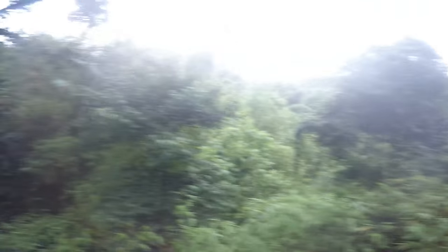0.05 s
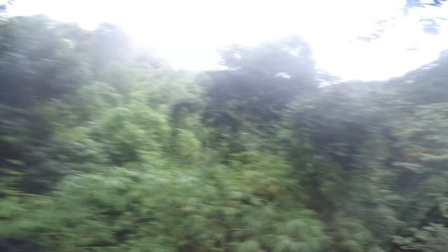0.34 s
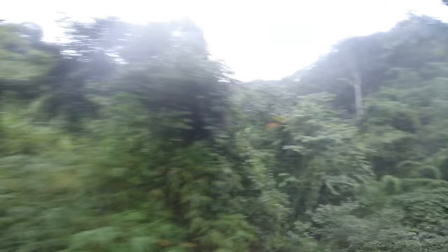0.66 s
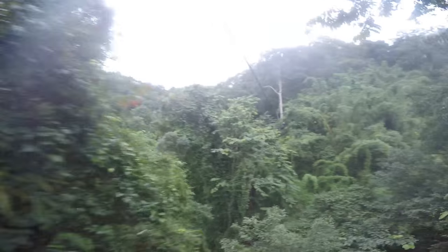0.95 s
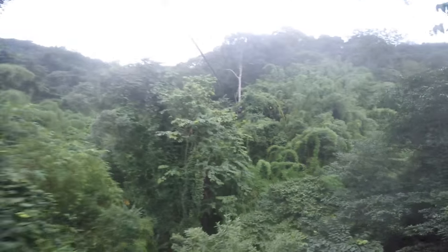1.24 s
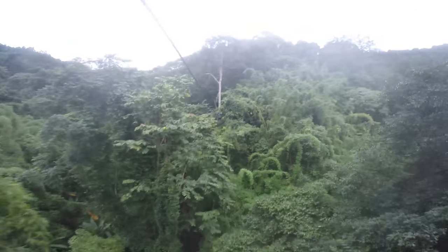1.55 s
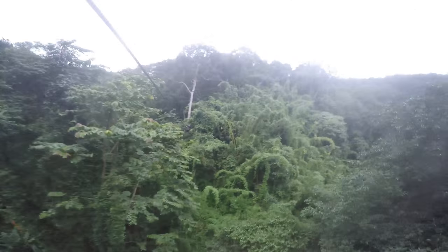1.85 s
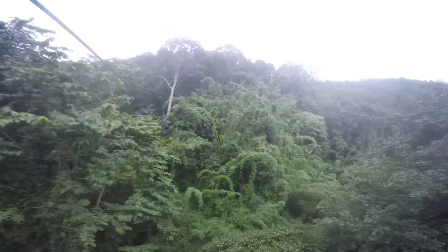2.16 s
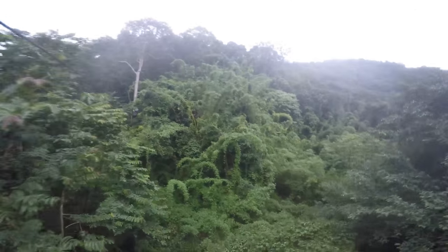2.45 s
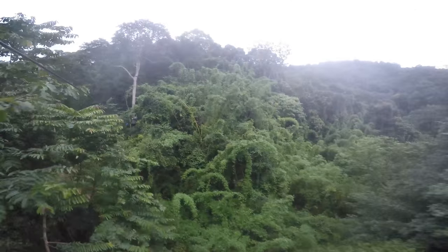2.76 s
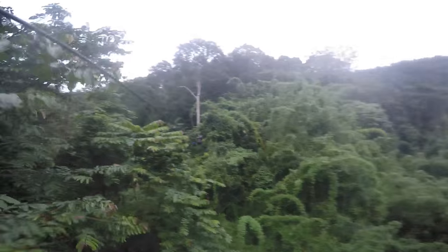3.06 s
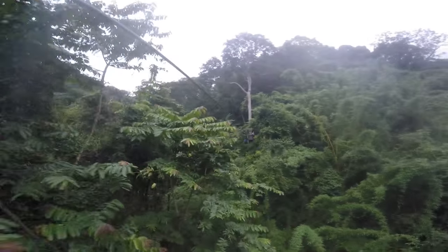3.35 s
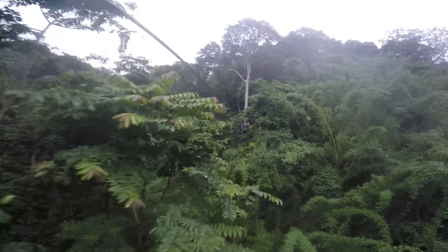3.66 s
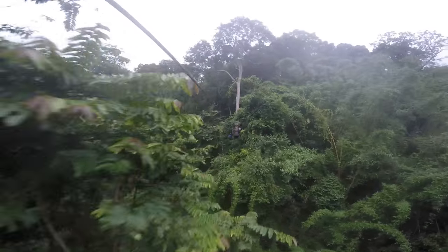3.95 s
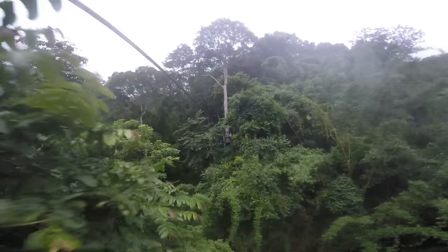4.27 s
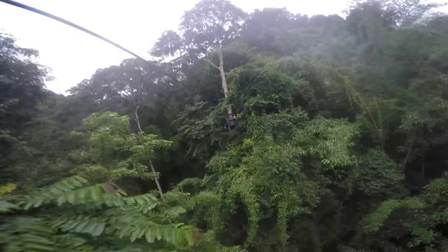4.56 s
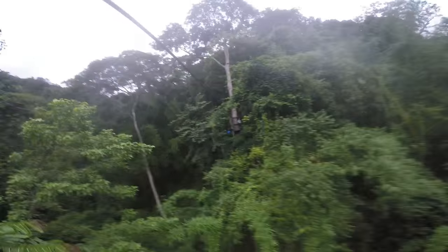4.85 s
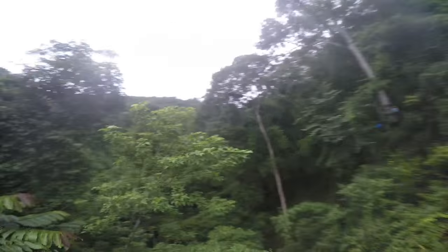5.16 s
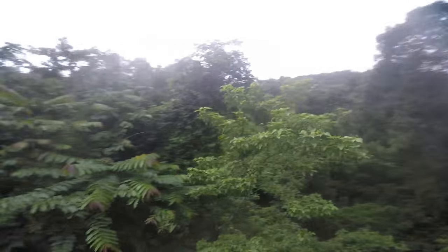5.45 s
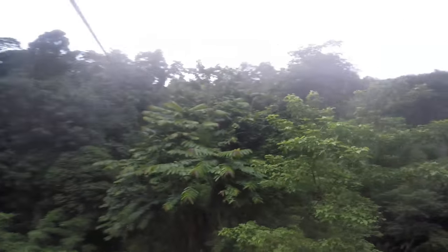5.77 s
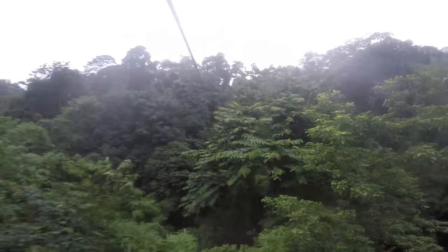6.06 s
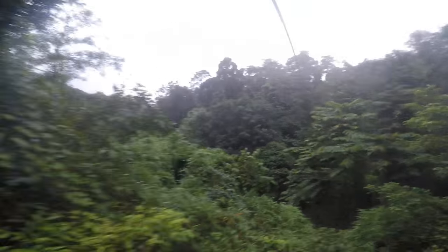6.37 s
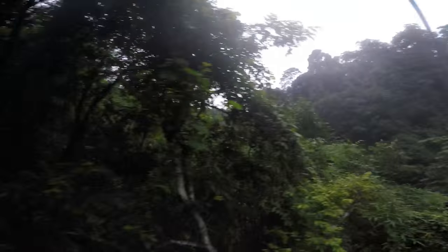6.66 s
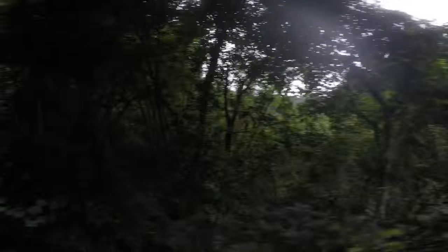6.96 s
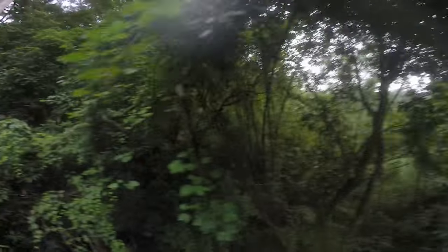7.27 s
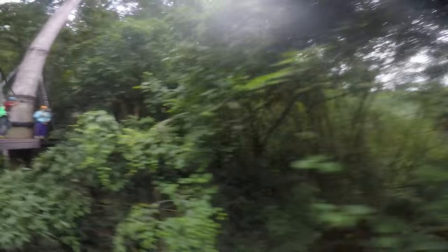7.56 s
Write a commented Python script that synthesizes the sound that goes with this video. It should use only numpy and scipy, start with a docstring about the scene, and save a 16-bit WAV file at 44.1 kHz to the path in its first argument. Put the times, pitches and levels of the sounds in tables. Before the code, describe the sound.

Outdoors, pulleys roll along a zip-line cable just overhead with a continuous sizzling whirr and a whine that rises with speed. The rider's microphone picks up low wind rumble and a few light, hollow bumps near the start. A wheel sings in short, fluttering tones through the middle. Later the whine sinks as the ride slows, while the wheel rim scrapes and rings against the cable and the wind buffets more strongly.

```python
"""A zip-line trolley hums along a stranded steel cable, gathering speed, then slowing.
Its pulleys ride the twisted strands, so the pitch follows the speed; a slipping wheel sings.
Friction in the groove rings the side plates, wheels and rims, with sizzle and hiss on top.
Wind buffets the rider's microphone, and a few early knocks land on its housing."""
import sys
import numpy as np
from scipy import signal
from scipy.fft import rfft, irfft, next_fast_len
from scipy.io import wavfile
from scipy.ndimage import uniform_filter1d, map_coordinates

SR = 44100
rng = np.random.default_rng(int(sys.argv[2]) if len(sys.argv) > 2 else 0)


def dump_mix(stems):
    """Bounce the given channels to the path in sys.argv[1] as a 16-bit WAV at rate SR."""
    frames = np.atleast_2d(stems).T  # one column per channel
    limited = np.clip(frames, -1, 1)  # hard clip at full scale
    pcm = np.round(limited * 32767).astype(np.int16)
    wavfile.write(sys.argv[1], SR, pcm)


N = 335766
TIME = np.arange(N) / SR


def strand_hum(speed, strands, load_db):
    """The pulleys ride the twisted strands and hum at multiples of the strand rate."""
    # The main partials. Each row: multiple of the strand rate, gain in dB, share of the load swing,
    # phase blur in radians per multiple, flutter in dB, gain in dB once the wheel leans.
    main_partials = [(2, 0, 1, 0.11, 1.5, 5), (3, -5.5, .1, 0.53, -1, -11), (4, 0.5, 0.8, 0.13, 2, 4),
                     (6, -4.5, 0.32, 0.13, 1, 2.5)]
    # The upper partials. Each row: multiple of the strand rate, relative level in dB.
    overtones = [(5, 1), (8, 5.5), (10, 12.5), (12, 5.5)]
    # How strongly the trolley radiates each pitch. Each row: frequency in Hz, level in dB.
    response = [(430, -49), (500, -65.5), (545, -58.5), (595, -57), (620, -59), (640, -52), (652, -50),
                (720, -66), (860, -58), (980, -52.5), (1090, -50), (1180, -50.5), (1225, -50.5),
                (1270, -52), (1303, -45), (1480, -47.5), (1660, -52), (1790, -41), (1970, -43)]
    # A partial ducks briefly. Each row: centre and half length in seconds, multiple, depth in dB.
    fades = [(0.2, 0.27, 4, -18), (0.85, 0.35, 2, -7), (1.147, 0.8, 6, -13), (5.45, 0.25, 2, -10),
             (5.665, 0.15, 4, -6), (6.044, 0.11, 4, -13), (7.22, 0.05, 2, -23), (7.57, 0.069, 2, -22)]
    # The groan in the groove. Each row: cycles per strand, relative level in dB.
    groan_texture = [(2.2, -19), (2.55, -12), (2.8, -34), (3, 4), (3.2, -14.5), (3.4, 1.5), (3.8, -14.5)]
    groan_db, upper_db = -49, -52
    strands_per_turn, wobble_strands = 16, 0.016
    lean_start_s, lean_ramp_s = 4.9, 0.69
    pace = speed / speed.max()
    unrest = pace ** -4  # a slow wheel follows every bump
    # A wheel slightly out of round wobbles the pitch once a turn.
    rolled = strands + wobble_strands * unrest * np.sin(2 * np.pi * strands / strands_per_turn)
    # Late in the run the wheel leans on its rim: less groan, sharper upper partials.
    lean = np.clip((TIME - lean_start_s) / lean_ramp_s, 0, 1)
    hum = from_db(groan_db - 9 * lean) * pace ** 5.3 * cable_rasp(groan_texture, speed, strands)
    for multiple, db, load_share, blur, flutter_db, lean_db in main_partials:
        response_db = np.interp(multiple * speed, *np.transpose(sorted(response)))
        fade_db = sum(depth_db * bell(s, half_s) for s, half_s, k, depth_db in fades if k == multiple)
        gain = from_db(db + response_db + load_share * load_db + lean_db * lean + fade_db)
        hum += gain * partial(rolled, unrest, multiple, blur, flutter_db)
    # The higher the partial, the more speed it needs.
    upper = sum(from_db(db) * pace ** k * partial(rolled, unrest, k, blur=0.085, flutter_db=3)
                for k, db in overtones)
    return hum + wheel_song(rolled) + from_db(upper_db + 0.74 * load_db + 3 * lean) * upper


def partial(strands, unrest, multiple, blur, flutter_db):
    """One partial of the hum; uneven strands blur its phase and shake its level."""
    jitter = blur * multiple * (drift(4.9) + 0.27 * unrest * drift(46))
    phase = 2 * np.pi * multiple * strands + jitter
    return rms_one(np.sin(phase) * from_db(flutter_db * drift(36)))


def wheel_song(strands):
    """The wheel slips in the groove and sings a tone that flutters and breaks up."""
    # Each row: centre and half length in seconds, multiple of the strand rate, level in dB,
    # ratio of clean tone to hoarseness.
    slips = [(0.1, 0.28, 6, -42.5, 1), (2.21, 0.07, 6, -39, 1.6), (2.4, 0.12, 6, -37.5, 1.8),
             (2.67, 0.14, 6, -42, 1.8), (3.0, 0.24, 6, -38.5, 2.2), (3.529, 0.17, 6, -37.5, 2.4),
             (3.68, 0.25, 10, -35.5, 1.3), (4.082, 0.08, 10, -37, 1.2), (4.57, 0.1, 6, -39, 1.8),
             (4.85, 0.18, 6, -36.5, 2.2), (5.111, 0.081, 6, -39, 1.8), (5.53, 0.12, 6, -34, 1.9),
             (5.471, 0.22, 7, -41, .8), (5.539, 0.11, 8, -38.5, 1), (5.6, 0.2, 5, -43, 0.67),
             (5.949, 0.36, 10, -34.5, 1.2), (6.8, 0.4, 8, -45, 1)]
    return sum(from_db(db) * hoarse_tone(s, half_s, multiple * strands, width_hz=30, clean=clean)
               for s, half_s, multiple, db, clean in slips)


def cable_rasp(texture, speed, strands):
    """The uneven cable passes at the speed of travel, so its rasp glides with the hum."""
    mean_speed = speed.mean()
    surface = noise([(cycles * mean_speed, db) for cycles, db in texture])
    return map_coordinates(surface, [strands / mean_speed * SR], order=1, mode="nearest")


def trolley_whirr(speed, strands, load_db, sizzle_db, hiss_db):
    """Friction rings the plates, wheels and rims, sizzles and hisses; rubs and scrapes swell it."""
    # The trolley's resonances. Each row: frequency in Hz, width in Hz, relative level in dB.
    plate_modes = [(1600, 245, -8.5), (2415, 157, 1), (2730, 77, -4)]
    wheel_modes = [(3018, 330, -7.5), (3277, 226, 1.5), (3422, 152, 3), (4170, 31, -11.5)]
    rim_modes = [(3605, 260, 4.5), (3665, 113, 8.5), (3807, 91, -4)]
    sizzle_modes = [(4170, 390, -6.5), (4744, 174, 2), (5090, 300, -4), (5500, 340, 1.5), (5860, 220, 4),
                    (6160, 135, 3), (6491, 190, 9), (6602, 364, 8), (6957, 260, 4)]
    # The contact hiss. Each row: frequency in Hz, relative level in dB.
    hiss_spectrum = [(4200, -43), (7000, 10), (7400, 11), (7700, 6.5), (8020, 11.5), (8500, 5), (9050, 6.5),
                     (9500, 3.5), (9850, 7), (10150, 0.5), (10600, 10), (11100, 5.5), (11700, -3),
                     (12700, 5.5), (13600, -0.5), (15300, -4)]
    # The cable's unevenness. Each row: cycles per strand, relative level in dB.
    cable_texture = [(2.3, -12), (3.9, -14.5), (4.6, -3), (4.8, -17), (5.05, -12), (5.25, 1.5), (5.9, 1),
                     (6.4, 1), (7, 3), (7.5, -36), (8, 5.5), (8.6, 1), (10, -7.5), (11, -7.5)]
    # The roughness of the passing cable. Each row: time in seconds, rasp level in dB.
    roughness = [(0, -45.5), (.5, -47.5), (1.05, -41.5), (1.3, -52), (1.75, -39.5), (2.4, -35), (2.8, -36),
                 (3.6, -36), (4.35, -41), (4.65, -37), (5.1, -44.5), (5.7, -41), (6.4, -43), (6.6, -39.5),
                 (7.61, -39.5)]
    # The rider sways and presses the rim against the cable.
    # Each row: centre and half length in seconds, rim level in dB, plate level in dB.
    rubs = [(5.542, 0.095, -25, -40), (5.8, 0.18, -26, -30), (6.16, 0.17, -29, -33),
            (6.45, 0.12, -23.5, -34), (6.76, 0.18, -20.5, -33.5), (7.124, 0.1, -23.5, -75),
            (7.23, 0.087, -39, -32.5), (7.42, 0.18, -25, -36)]
    # Brief hard scrapes of the rim. Each row: centre in seconds, boost in dB.
    scrapes = [(5.491, 5), (5.517, 1.5), (5.578, 4), (5.879, 5), (6.644, 4.5), (6.853, 2.5)]
    plate_db, wheel_db, rim_db = -40.5, -31, -36.5
    rim_rub = swells([(s, half_s, db) for s, half_s, db, _ in rubs])
    plate_rub = swells([(s, half_s, db) for s, half_s, _, db in rubs])
    plate_gain = np.hypot(from_db(plate_db + 0.39 * load_db), plate_rub)
    rim_gain = np.hypot(from_db(rim_db + load_db), rim_rub)
    rolling = friction(speed, grains_per_strand=7, size_db=2.5, smooth_db=-2, flutter_db=0.3)
    rubbing = friction(speed, grains_per_strand=5.6, size_db=3.5, smooth_db=1, flutter_db=1.26)
    fine = friction(speed, grains_per_strand=16, size_db=4, smooth_db=1, flutter_db=0.75)
    gritty = friction(speed, grains_per_strand=12, size_db=3, smooth_db=-5, flutter_db=1.17)
    rasp_db, = curves(roughness)
    body = from_db(rasp_db) * cable_rasp(cable_texture, speed, strands) + whines()
    body += plate_gain * resonate(rolling, plate_modes, low_hz=1150, high_hz=3040)
    body += from_db(wheel_db + load_db) * resonate(rolling, wheel_modes, low_hz=2460, high_hz=4350)
    body += rim_gain * resonate(rubbing, rim_modes, low_hz=3303, high_hz=4050)
    treble = from_db(sizzle_db + 0.5) * resonate(fine, sizzle_modes, low_hz=3940, high_hz=6850)
    treble += from_db(hiss_db - 0.5) * colour(gritty, hiss_spectrum)
    whirr = rider_echoes(shift_colour(frame_notches(body + treble)))
    scrape_db = sum(db * bell(s, half_s=0.0091) for s, db in scrapes)
    return whirr * from_db(scrape_db + 0.62 * drift(20))


def friction(speed, grains_per_strand, size_db, smooth_db, flutter_db):
    """Tiny uneven impacts of wires on the groove, over smooth sliding noise."""
    hits = rng.random(N) < grains_per_strand * speed / SR
    sizes = from_db(size_db * np.minimum(rng.exponential(1, N), 3)) * rng.choice([-1, 1], N)
    grains = rms_one(hits * sizes) + from_db(smooth_db) * rng.standard_normal(N)
    return grains * from_db(flutter_db * drift(39))


def whines():
    """Hoarse whines glide through the whirr or ring on the rim."""
    # Each row: centre and half length in seconds, pitch at the centre in Hz, glide in Hz per second,
    # width in Hz, level in dB.
    glides = [(0.303, 0.42, 1600, 404, 70, -46), (0.522, 0.19, 1472, 523, 51, -41.5),
              (0.722, 0.15, 1720, 550, 40, -47), (0.2, 0.32, 2418, 56, 44, -42.5),
              (0.757, 0.25, 2506, 400, 38, -38.5), (0.921, 0.1, 1960, 1500, 100, -42),
              (1.301, 0.4, 2087, -59, 62, -46.5), (0.795, 0.35, 3680, 3, 9.5, -37.5),
              (1.934, 0.21, 2496, 192, 70, -38), (2.098, 0.53, 3705, -1.5, 12, -40),
              (5.825, 0.12, 2443, -500, 36, -32), (6.0, 0.49, 3690, -1.5, 16, -32.5),
              (6.857, 0.38, 3694, -3.5, 10.6, -30.5)]
    out = np.zeros(N)
    for s, half_s, hz, hz_per_s, width_hz, db in glides:
        cycles = hz * TIME + hz_per_s * (TIME - s) ** 2 / 2
        out += from_db(db) * hoarse_tone(s, half_s, cycles, width_hz, clean=0)
    return out


def frame_notches(x):
    """The frame hardly moves at its antiresonances, which notch the whirr."""
    # Each row: frequency in Hz, width in Hz, depth in dB.
    antiresonances = [(2285, 64, -2), (4025, 78, -7.5), (4350, 110, -5), (5220, 130, -5.5),
                      (6300, 136, -15)]
    for hz, width_hz, db in antiresonances:
        x = band_eq(x, hz, width_hz, db)
    return x


def shift_colour(x):
    """Peaks and hollows come and go in the whirr."""
    # The sizzle's low edge thins and fills in. Each row: time in seconds, gain in dB.
    low_sizzle = [(0, -19), (.55, -7), (1.3, -10), (2.3, 6.5), (3.3, 3), (4.05, -5), (4.5, 4.5), (5.1, 2),
                  (5.5, -7), (7.05, -1.5), (7.27, -8), (7.45, 0)]
    # Each row: centre and half length in seconds, frequency and width in Hz, boost or cut in dB.
    shifts = [(0.1, 0.54, 7140, 500, 10.5), (0.0, 0.16, 5270, 700, -16), (-0.2, 0.55, 6440, 400, -7),
              (1.15, 0.54, 6780, 353, -19), (1.35, 0.28, 1410, 180, 8), (1.7, 0.86, 1560, 220, -4),
              (0.6, 0.5, 2050, 150, -6), (0, 0.45, 1800, 70, -4), (5, 0.44, 2030, 99, -7),
              (0.46, 0.028, 13800, 2500, 7), (0.65, 0.25, 13000, 900, 7), (0.2, 0.4, 8600, 600, 2.5),
              (3.5, 0.27, 15000, 900, 2), (4, 0.35, 10600, 1100, 4), (4.0, 0.41, 1500, 370, 2.5),
              (4.15, 0.44, 2500, 260, -4), (5, 0.4, 2480, 160, -4), (5, 0.42, 6520, 250, -5),
              (5, 0.46, 10330, 300, -6), (0.5, 0.7, 8200, 450, -5), (1, 0.8, 4300, 200, -4),
              (4.45, 0.26, 5450, 400, 7.5), (5.25, 0.22, 2400, 300, 1), (6.75, 0.46, 1330, 200, -9),
              (7.55, 0.17, 2700, 350, -1), (2.73, 0.2, 2680, 380, -6), (4.5, 1.73, 3650, 260, -6),
              (4.74, 0.27, 2760, 460, -16.5), (4.75, 0.39, 4700, 560, -13), (4.796, 0.42, 5450, 400, 6),
              (4, 0.74, 7400, 300, -5), (4.5, 1.3, 8070, 400, 4), (5, 0.57, 3390, 210, 5),
              (4.938, 0.18, 11100, 600, 11), (5.397, 0.25, 13600, 600, 4), (5.527, 0.15, 3380, 200, 8),
              (6, 0.11, 5500, 250, 6), (5.95, 0.25, 11000, 760, 9.5), (6.397, 0.7, 8050, 500, -8),
              (6.65, 0.4, 12700, 1490, 7.5), (7.27, 0.073, 5500, 1500, -18), (7.35, 0.3, 1600, 450, -10)]
    low_db, = curves(low_sizzle)
    out = band_eq(x, hz=4680, width_hz=440, db=low_db)
    for s, half_s, hz, width_hz, db in shifts:
        near = around(s, half_s)
        out[near] = band_eq(out[near], hz, width_hz, db * bell(s, half_s)[near])
    return out


def rider_echoes(x):
    """Short echoes off the rider and gear comb the whirr, sweeping as the rider swivels."""
    # The swivel. Each row: time in seconds, turn from 0 (along the cable) to 1 (side-on).
    swivel = [(0, 0.87), (0.45, 0.68), (1.1, 0.49), (1.9, 0.5), (2.4, 0.14), (3, 0.15), (3.55, 0.1),
              (4.05, 0.45), (4.6, 0.015), (5.2, 0.014), (5.65, 0.59), (6.05, 0.77), (6.5, 0.79),
              (6.87, 0.89), (7.08, 0.37), (7.28, 0.87), (7.43, 0.69), (7.61, 0.99)]
    # Each row: extra path in metres along the cable and side-on, then gain along and side-on.
    echoes = [(0.037, 0.097, 0.066, 0.26), (0.17, 0.169, 0.14, -0.11), (0.271, 0.262, 0.2, 0.085),
              (0.331, 0.35, 0.209, -0.063), (0.511, 0.507, -0.21, -0.076)]
    sound_m_per_s = 343
    turn, = curves(swivel)
    out = x.copy()
    for path_along, path_side, gain_along, gain_side in echoes:
        path = path_along + (path_side - path_along) * turn
        gain = gain_along + (gain_side - gain_along) * turn
        out += gain * np.interp(TIME - path / sound_m_per_s, TIME, x)
    return out


def wind(speed):
    """Eddies rumble on the microphone, gusts buffet it and sound its housing, and air rushes past."""
    # The wind's spectra. Each row: frequency in Hz, relative level in dB.
    rumble_spectrum = [(10, 2), (18, -6.5), (27, 5), (36, -6), (50, -14), (75, -27), (150, -39.5)]
    buffet_spectrum = [(35, -13), (65, 2.5), (100, -3), (135, -8.5), (175, -21.5), (250, -28.5),
                       (600, -33.5), (1500, -35)]
    rush_spectrum = [(150, 8.5), (320, -7), (480, -4), (750, -3.5), (1100, -2), (2000, -1.5), (5000, -23),
                     (15000, -29)]
    # Swells of wind. Each row: centre and half length in seconds, level in dB.
    eddies = [(0.2, 0.18, -34), (0.5, 0.16, -29), (0.95, 0.16, -28.5), (1.67, 0.068, -33),
              (2.07, 0.035, -24), (2.32, 0.061, -26), (2.56, 0.12, -30.5), (3.38, 0.079, -27.5),
              (3.68, 0.088, -27), (3.92, 0.08, -36), (4.68, 0.097, -27), (5.0, 0.11, -29.5),
              (5.6, 0.17, -25.5), (6.17, 0.21, -25), (6.72, 0.29, -28), (7.13, 0.05, -27),
              (7.45, 0.17, -30.5)]
    gusts = [(5.65, 0.11, -46), (6.05, 0.15, -47), (6.23, 0.039, -31.5), (6.38, 0.05, -28),
             (6.47, 0.042, -33.5), (6.78, 0.057, -34.5), (6.95, 0.076, -34), (7.13, 0.093, -38.5)]
    # The housing's resonance in the airflow: frequency in Hz, width in Hz, relative level in dB.
    cavity_mode = [(200.2, 30, 0)]
    lull_db, buffet_db, cavity_db, gust_to_cavity_db, rush_db = -33, -46.5, -53, -22, -51
    pace = speed / speed.max()
    airflow = pace ** 2.1
    gust = swells(gusts)
    rumble = np.hypot(from_db(lull_db), swells(eddies)) * evened(noise(rumble_spectrum), window_s=0.142)
    lumps = evened(noise(buffet_spectrum) * from_db(3.1 * drift(15.5)), window_s=0.09)
    buffet = np.hypot(from_db(buffet_db + 2.3 * drift(8)) * airflow, gust) * lumps
    cavity_gain = from_db(cavity_db) * airflow + from_db(gust_to_cavity_db) * gust
    cavity = cavity_gain * resonate(rng.standard_normal(N), cavity_mode, low_hz=124, high_hz=358)
    rush = from_db(rush_db) * pace ** 1.1 * noise(rush_spectrum)
    return rumble + buffet + cavity + rush


def knocks():
    """Each soft knock gives a hollow click of the housing, a quick rebound and a thud of its mount."""
    # Each row: start in seconds, click gain in dB, low-pass cutoff in Hz, thud pitch in Hz,
    # thud gain in dB, thud t60 in seconds.
    blows = [(0.628, -16.5, 1340, 222.4, -22.5, 0.073), (0.721, -11, 1290, 62.5, -14.5, 0.082),
             (1.027, -26, 1400, 200, -46, 0.02), (1.035, -18, 1600, 200, -39, 0.03),
             (1.166, -24, 2000, 200, -46, 0.02), (1.171, -8, 1800, 105, -16.5, 0.042)]
    # The housing's modes. Each row: frequency in Hz, relative level in dB, t60 in seconds.
    housing_modes = [(219, -5, 0.037), (600, -6, 0.006), (875, 0.5, 0.0023), (1300, -1, 0.0026)]
    rebound_s, rebound_db = 0.00277, -15
    low_cut = signal.butter(1, 450, "high", fs=SR, output="sos")
    out = np.zeros(N)
    for s, click_db, cutoff_hz, thud_hz, thud_db, thud_t60 in blows:
        click = np.zeros(N)
        for hz, db, t60 in housing_modes:
            rebound = from_db(rebound_db) * struck(s + rebound_s, hz, t60)
            click += from_db(click_db + db) * (struck(s, hz, t60) + rebound)
        blow = signal.sosfilt(low_cut, click) + from_db(thud_db) * struck(s, thud_hz, thud_t60)
        out += signal.sosfilt(signal.butter(3, cutoff_hz, fs=SR, output="sos"), blow + 1e-18)
    return out


def struck(start_s, hz, t60):
    """A sine that starts at a blow and dies away."""
    age = np.clip(TIME - start_s, 0, 4 * t60)
    return np.sin(2 * np.pi * hz * age) * from_db(-60 * age / t60)


def hoarse_tone(s, half_s, cycles, width_hz, clean):
    """A narrow band of noise, with `clean` parts of pure tone, swells to rms 1 and fades."""
    out, near = bell(s, half_s), around(s, half_s)
    phase = 2 * np.pi * cycles[near]
    tone = (clean + drift(width_hz, len(phase))) * np.cos(phase)
    tone += drift(width_hz, len(phase)) * np.sin(phase)
    out[near] *= evened(tone, window_s=0.049)
    return out


def resonate(x, modes, low_hz, high_hz):
    """Parallel resonances of one part, which radiates between two band edges; rms 1."""
    out = np.zeros(N)
    for k, (hz, width_hz, db) in enumerate(modes):
        r = np.exp(-np.pi * width_hz / SR)
        ring = signal.lfilter([1, 0, -1], [1, -2 * r * np.cos(2 * np.pi * hz / SR), r * r], x)
        out += (-1) ** k * from_db(db) * (1 - r * r) / 2 * ring
    band = signal.butter(4, [low_hz, high_hz], "band", fs=SR, output="sos")
    return rms_one(signal.sosfilt(band, out))


def band_eq(x, hz, width_hz, db):
    """Boost or cut one band by a steady or moving amount."""
    band = signal.butter(1, [hz - width_hz / 2, hz + width_hz / 2], "band", fs=SR, output="sos")
    return x + (from_db(db) - 1) * signal.sosfilt(band, x)


def colour(x, spectrum):
    """Shape x with a spectrum that falls 20 dB an octave beyond its ends; rms 1."""
    hz, db = np.transpose(spectrum)
    size = next_fast_len(N)
    octave = np.log2(np.maximum(np.fft.rfftfreq(size, 1 / SR), 1))
    beyond = np.abs(octave - np.clip(octave, np.log2(hz[0]), np.log2(hz[-1])))
    gain = from_db(np.interp(octave, np.log2(hz), db) - 20 * beyond)
    return rms_one(irfft(rfft(x, size) * gain, size)[:N])


def noise(spectrum):
    """Steady noise of a given spectrum; rms 1."""
    return colour(rng.standard_normal(N), spectrum)


def drift(rate, size=N):
    """Smooth random motion that changes about `rate` times a second; spread 1."""
    r = np.exp(-40 * np.pi * rate / SR)
    slow = signal.lfilter([1], [1, -2 * r, r * r], rng.standard_normal(N // 20 + 4002))[4000:]
    return np.interp(np.arange(size) / 20, np.arange(len(slow)), rms_one(slow))


def swells(rows):
    """A gain made of bells, one for each centre, half length and level."""
    return sum(from_db(db) * bell(s, half_s) for s, half_s, db in rows)


def bell(s, half_s):
    """A smooth rise to 1 and fall, centred on s seconds."""
    out, near = np.zeros(N), around(s, half_s)
    out[near] = np.exp(-((TIME[near] - s) / half_s) ** 2)
    return out


def around(s, half_s):
    """The samples that a bell covers."""
    return slice(*np.searchsorted(TIME, [s - 3 * half_s, s + 3 * half_s]))


def curves(rows):
    """Breakpoints in time, drawn out to one curve a column."""
    s, *columns = np.transpose(rows)
    return [np.interp(TIME, s, column) for column in columns]


def evened(x, window_s):
    """Hold the slow level of x at rms 1."""
    return x / np.sqrt(uniform_filter1d(x ** 2, int(window_s * SR)) + 1e-9)


def rms_one(x):
    return x / np.sqrt(np.mean(x ** 2) + 1e-20)


def from_db(db):
    return 10 ** (np.asarray(db) / 20)


def scene():
    """The trolley overhead, the wind and the knocks at one microphone."""
    # The ride. Each row: time in seconds, speed in cable strands per second.
    travel = [(0.0, 217), (0.13, 234), (0.33, 247), (0.44, 247), (0.8, 261), (1.42, 283), (1.76, 293),
              (2.28, 311), (2.4, 317.5), (2.52, 314), (2.72, 313), (3.12, 321), (3.3, 321), (3.58, 328.5),
              (3.68, 326), (3.86, 327.5), (4.1, 325), (4.38, 316), (4.5, 327), (4.6, 321.5), (4.75, 322),
              (5.03, 317.5), (5.15, 309), (5.24, 320), (5.42, 309), (5.56, 309), (5.65, 297), (5.72, 300),
              (5.79, 296), (5.9, 304), (6.2, 298), (6.57, 270), (6.66, 275.5), (6.85, 264), (6.95, 277),
              (7.05, 260), (7.11, 266), (7.23, 236), (7.31, 254), (7.38, 245), (7.46, 251), (7.55, 219),
              (7.61, 236)]
    # The rolling contact. Each row: time in seconds, then whirr, sizzle and hiss levels in dB.
    contact = [(0.0, -36, -39, -52.5), (0.25, -34.5, -39, -50.5), (0.5, -29.5, -38.5, -48),
               (0.92, -30.5, -34, -47), (1.3, -34.5, -35.5, -49), (1.85, -30, -36, -49),
               (2.35, -32, -38, -47), (2.85, -35, -40, -50), (3.55, -28, -29.5, -44),
               (4.0, -28, -30.5, -42.5), (4.45, -36, -40, -47), (5.15, -36, -37.0, -45.5),
               (5.38, -29, -33.5, -43), (5.52, -31, -28, -40.5), (5.7, -32.5, -28, -42),
               (5.9, -29, -31.5, -40), (6.55, -28, -34, -44.5), (6.82, -27, -33, -42.5),
               (7.27, -27, -29, -44), (7.45, -30, -30.5, -44.5), (7.61, -31, -39, -44.5)]
    usual_whirr_db = -32
    speed, = curves(travel)
    whirr_db, sizzle_db, hiss_db = curves(contact)
    load_db = whirr_db - usual_whirr_db
    strands = np.cumsum(speed) / SR  # strands passed so far
    hum = strand_hum(speed, strands, load_db)
    whirr = trolley_whirr(speed, strands, load_db, sizzle_db, hiss_db)
    return (hum + whirr + wind(speed) + knocks())[None]


def record(dry):
    """A steep low-pass takes off the very top."""
    cutoff_hz = 15400
    return signal.sosfilt(signal.ellip(10, .1, 80, cutoff_hz, fs=SR, output="sos"), dry)


dry = scene()
out = record(dry)
dump_mix(out)
```